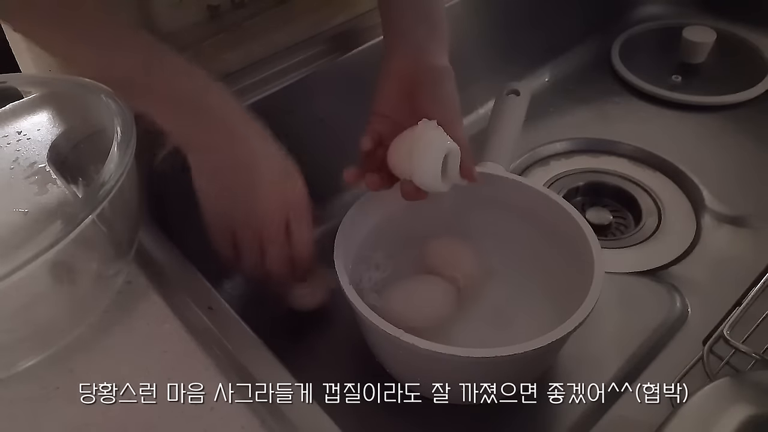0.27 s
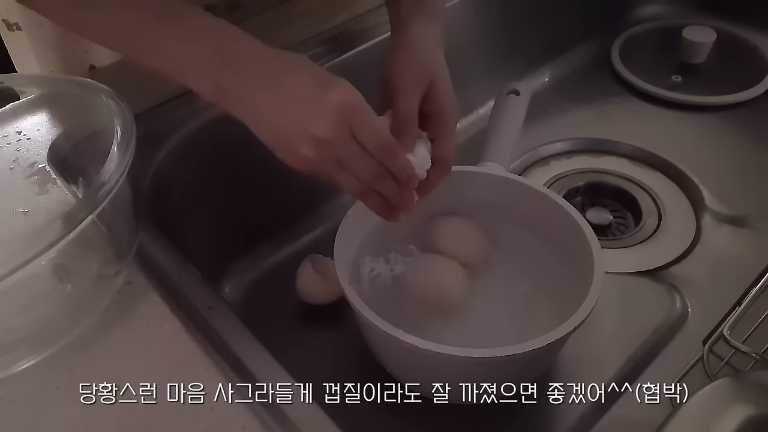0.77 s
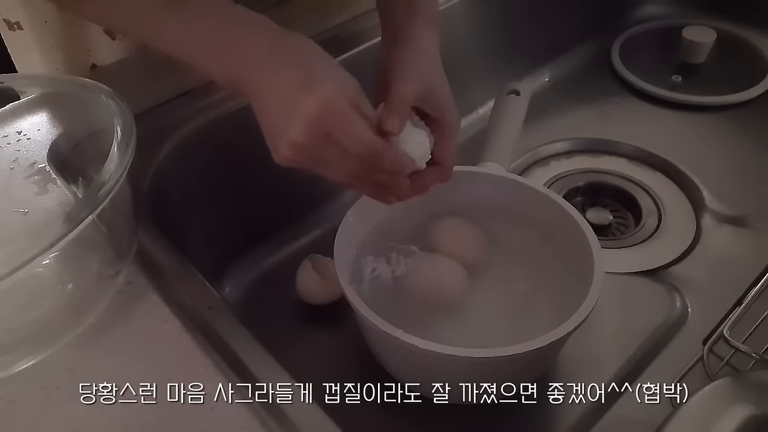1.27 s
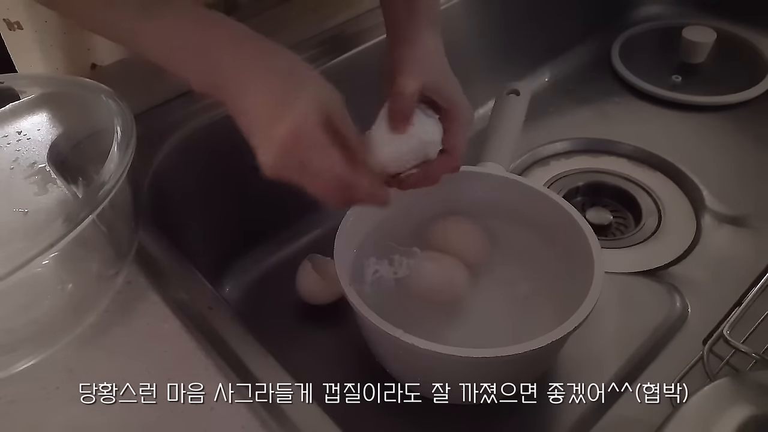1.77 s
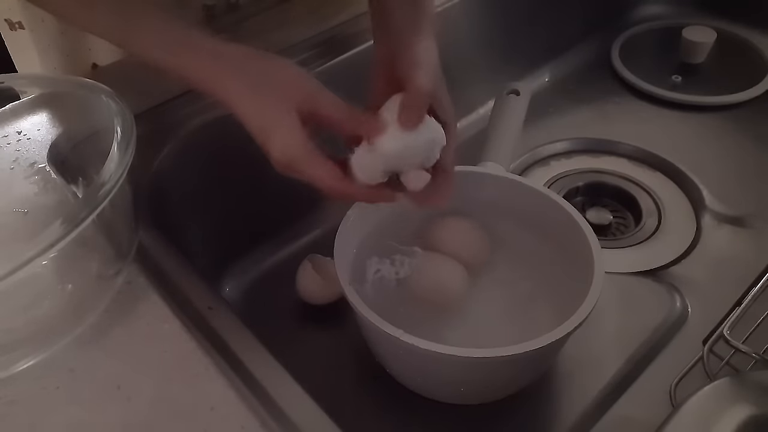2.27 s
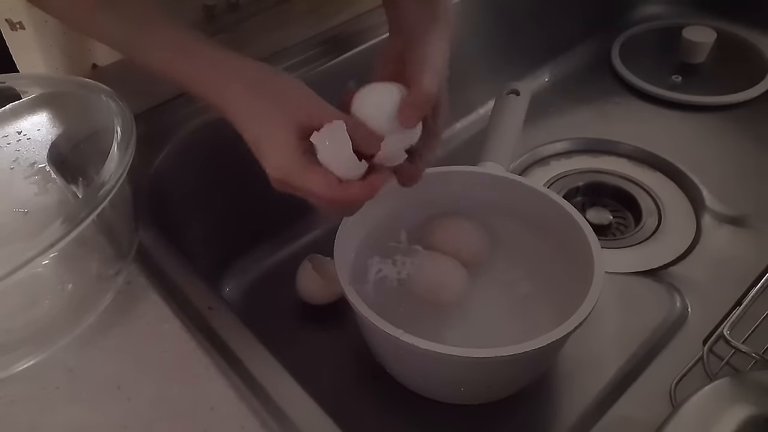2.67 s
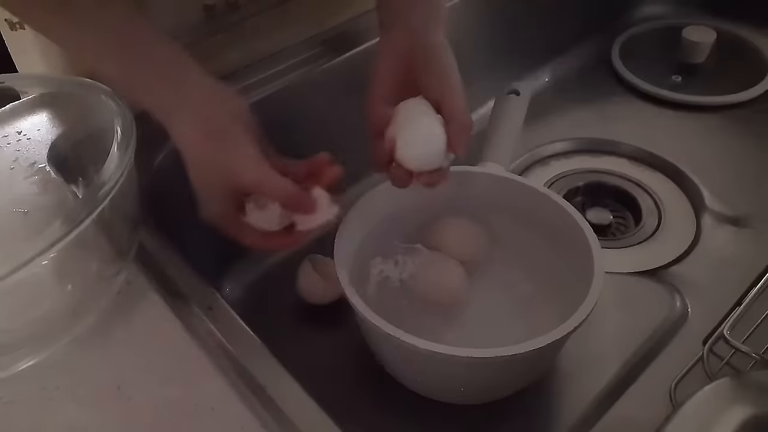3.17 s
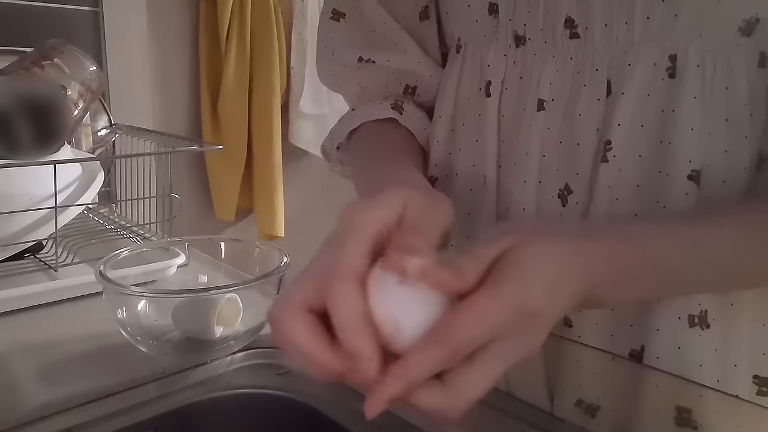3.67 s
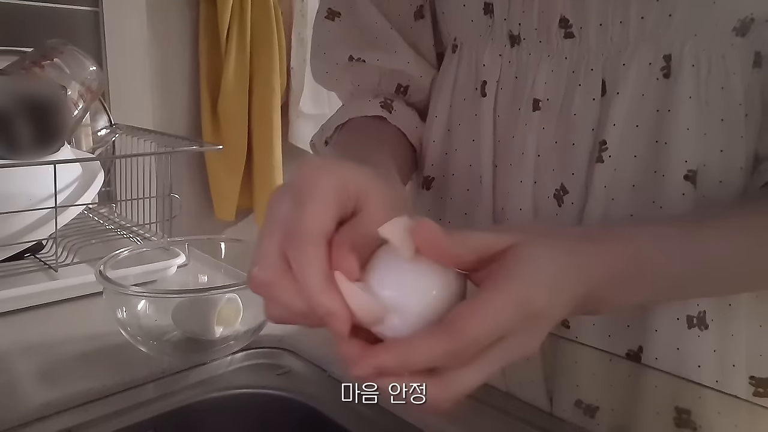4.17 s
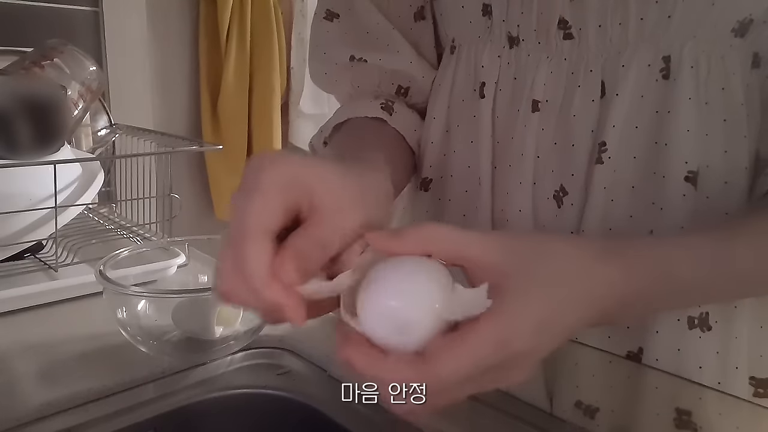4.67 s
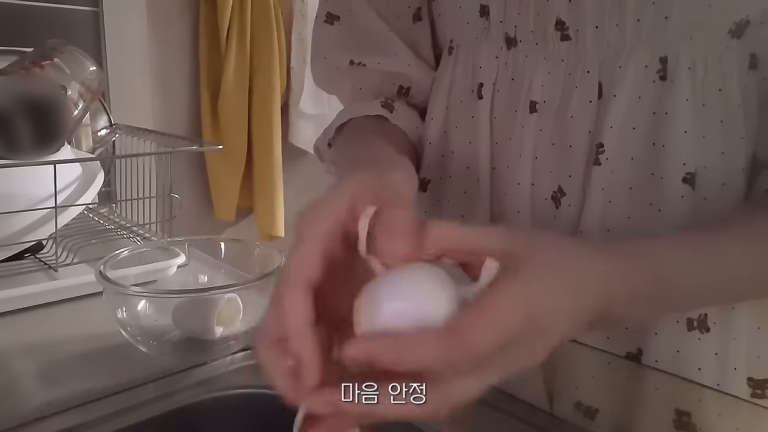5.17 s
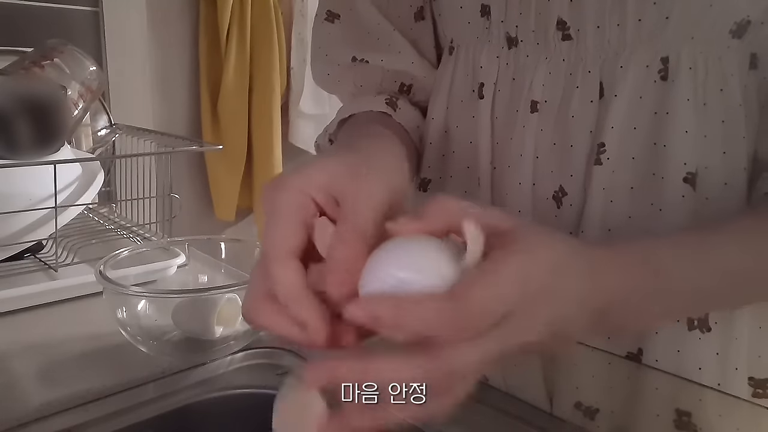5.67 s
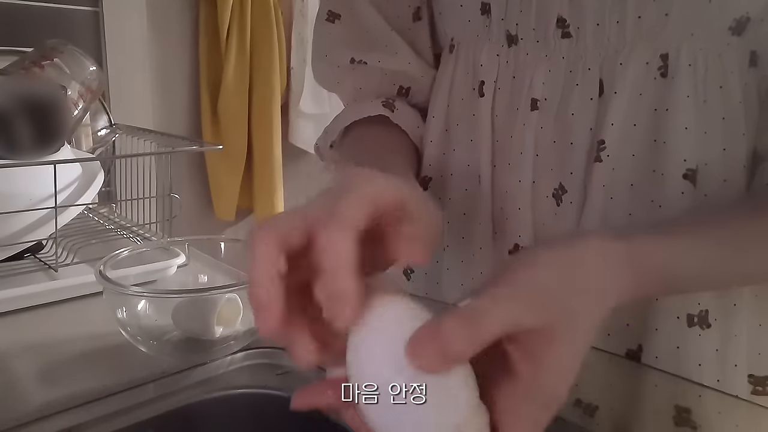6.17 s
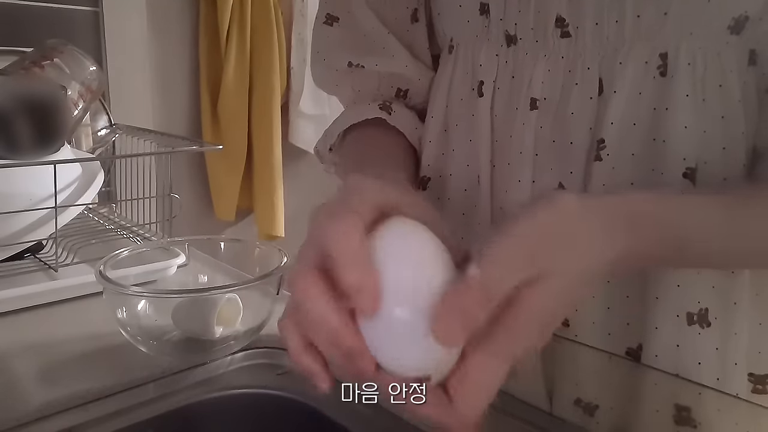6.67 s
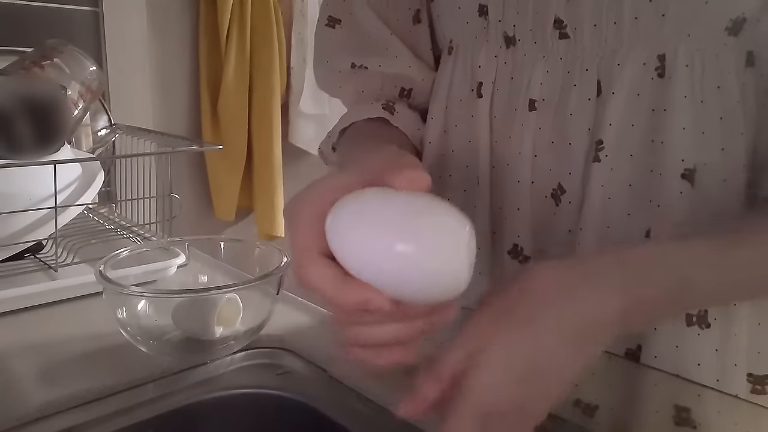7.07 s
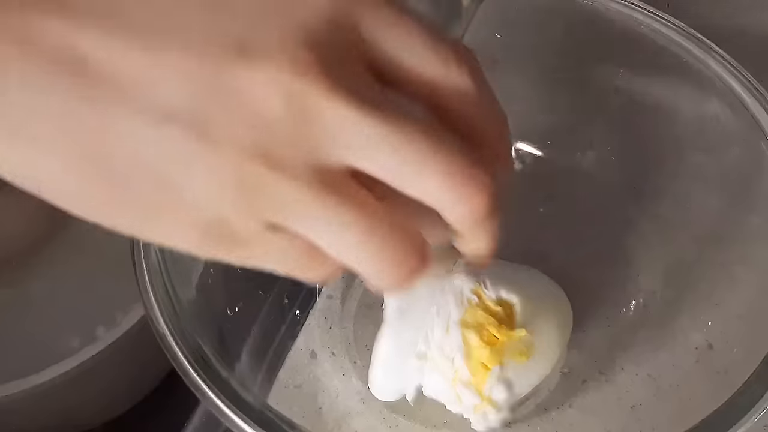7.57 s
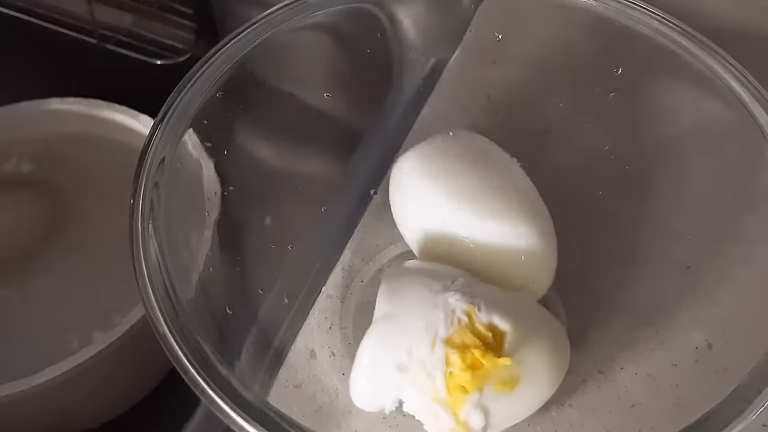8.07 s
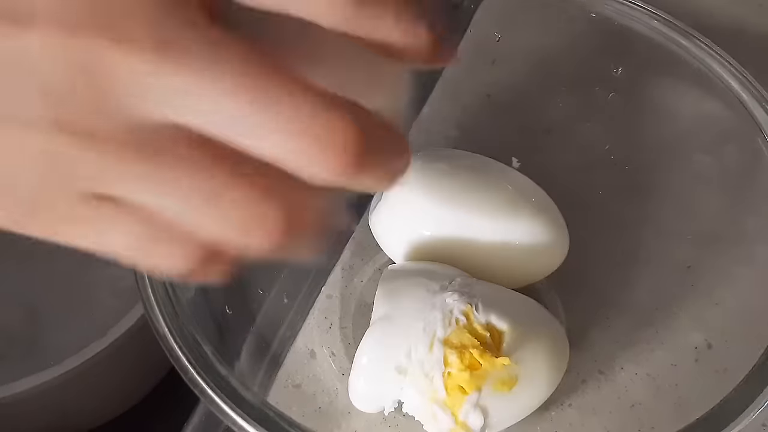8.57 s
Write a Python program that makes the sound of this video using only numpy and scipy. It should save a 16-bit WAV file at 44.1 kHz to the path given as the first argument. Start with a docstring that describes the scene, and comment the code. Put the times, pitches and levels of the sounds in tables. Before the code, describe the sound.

Close, quiet kitchen. Fingers peel a boiled egg: a dull steel boom from a dropped piece, then small bright snaps and crackly membrane tearing in uneven bursts, growing sharper midway. Bits of shell tick and boom in the sink. After a tiny silent gap, peeled eggs wobble with soft low thuds into a glass bowl. Faint mains hum and room rumble beneath.

```python
"""Peeling boiled eggs over a sink

Close on a pair of hands in a small, quiet kitchen: shell snaps and crackles in the hollow of the fingers, noise
clicks ringing in a resonant pocket. Pieces drop and set the steel basin's modes booming. At the end slippery
peeled eggs thud into a glass bowl, its low modes damped by soft contact. A mains hum of wavering sines and a
faint bed of coloured noise lie underneath; near 7.4 s all sound dips away briefly."""
import sys
import numpy as np
from scipy import signal
from scipy.fft import rfft, irfft, next_fast_len
from scipy.io import wavfile

SR = 44100
rng = np.random.default_rng(int(sys.argv[2]) if len(sys.argv) > 2 else 0)


def file_out(sig):
    """Save sig as 16-bit WAV at sys.argv[1]."""
    # one column per channel
    cols = np.atleast_2d(sig).T
    # limit, then scale
    lim = np.clip(cols, -1, 1)
    pcm = np.round(lim * 32767).astype(np.int16)
    wavfile.write(sys.argv[1], SR, pcm)


N = 388950
TIME = np.arange(N) / SR

# pulls of the thumb that tear the shell away: start_s, length_s, level_db (before trim)
PULLS = [(.61, 0.073, -65), (0.699, 0.25, -57), (1.018, .28, -54.5), (1.51, .11, -42.5), (1.659, 0.23, -49),
         (1.89, .17, -55), (2.1, 0.18, -76.5), (2.273, .1, -49), (2.388, .2, -58), (2.648, 0.25, -64),
         (2.968, .17, -66.5), (3.588, .1, -56), (3.881, 0.31, -50), (4.168, .11, -40), (4.44, .13, -43),
         (4.579, .2, -48), (4.819, .2, -61), (5.328, .12, -48.5), (5.45, 0.097, -40.5), (5.56, .24, -52),
         (6.07, .2, -49), (6.293, 0.23, -71.5), (7.292, 0.12, -65.5), (8.64, .1, -56)]
# colour of breaking shell: freq_hz, level_db
SHELL_COLOUR = [(100, -18), (400, -7), (850, -14.5), (1400, -3), (2500, -5.5), (5000, -3), (7500, 1),
                (9200, -3), (11500, 2.5), (15500, -2.5)]
# difference between left and right, less in the bass: freq_hz, side_db
STEREO_WIDTH = [(60, -15.5), (280, -10), (550, -6.5), (1000, 0), (16000, -3)]


def from_db(db):
    """Decibels to gain."""
    return 10 ** (np.asarray(db) / 20)


def rms_one(x):
    """Scale to rms 1."""
    return x / np.sqrt(np.mean(x ** 2) + 1e-20)


def hit_one(x):
    """Scale a hit to the energy of 4 ms at rms 1."""
    return rms_one(x) * np.sqrt(.004 * SR / x.shape[-1])


def in_time(rows):
    """A curve at every sample; the first and last values hold outside the table."""
    return np.interp(TIME, *np.transpose(rows))


def at_hz(points, hz):
    """Read a table on a log-frequency axis."""
    points = np.array(points)
    return np.interp(np.log(np.maximum(hz, 1)), np.log(points[:, 0]), points[:, 1])


def add(track, s, sound):
    """Mix a sound into a track at time s."""
    start = round(s * SR)
    track[:, start:start + sound.shape[-1]] += sound[:, :N - start]


def colour(x, spectrum):
    """Causal (minimum-phase) filter with the given spectrum, built by folding its cepstrum."""
    size = 2 * next_fast_len(x.shape[-1] // 2 + 1024)
    bins_hz = np.arange(size // 2 + 1) * SR / size
    cepstrum = irfft(np.log(from_db(at_hz(spectrum, bins_hz))))
    response = np.exp(rfft(2 * cepstrum[:size // 2], size) - cepstrum[0])
    return irfft(rfft(x, size) * response)[..., :x.shape[-1]]


def cut(x, hz, kind, order=2):
    """Butterworth filter."""
    return signal.sosfilt(signal.butter(order, hz, kind, fs=SR, output="sos"), x)


def stereo_noise(size):
    """Diffuse noise: alike left and right in the bass, far less alike in the treble."""
    mid, side = rng.standard_normal((2, size))
    return rms_one(mid + colour(side, STEREO_WIDTH) * [[1], [-1]])


def background(hum_db=0.0, waver=1.0, waver_hz=21.0):
    """Low room rumble and thin hiss as coloured noise, and a mains hum of sines that waver at random."""
    # hum partials: freq_hz, level_db (before wavering)
    hum_partials = [(50, -71), (100, -68)]
    # colour of the quiet room: freq_hz, level_db
    air_colour = [(22, -29), (36, -12.5), (50, 2), (75, -5.5), (120, 3), (195, -10), (285, -3.5), (420, -9),
                  (680, -17.5), (2000, -26), (4000, -28), (8500, -37), (12000, -22.5), (16000, -30.5)]
    # how the bed rises and falls: time_s, level_db
    air_level = [(0, -70), (3.3, -69.5), (7.38, -74), (7.45, -69.5), (8.82, -67)]
    level = from_db(in_time(air_level))
    hum = 0
    for hz, db in hum_partials:
        sway = 1 + waver * rms_one(cut(rng.standard_normal(N), waver_hz, "low"))
        tone = np.sin(2 * np.pi * (hz * TIME + rng.random()))
        hum = hum + np.sqrt(2) * from_db(db) * sway * tone
    air = level * rms_one(colour(stereo_noise(N), air_colour))
    return air + rms_one(level) * from_db(hum_db) * hum   # the hum follows the level of the bed


def dying(t60):
    """Diffuse noise that dies away by 60 dB in t60 seconds."""
    t = TIME[:int(t60 * SR) + 2]
    return stereo_noise(len(t)) * from_db(-60 * t / t60)


def scattered(t60, direct_db):
    """A click followed by its dense reflections off the sink and the worktop."""
    out = rms_one(dying(t60))
    spike = from_db(direct_db) * np.sqrt(out.shape[-1])
    out[0, 0] += spike
    out[1, rng.integers(0, 8)] += spike   # up to 7 samples later on the right
    return out


def struck(modes, spread_db=1.0, split_hz=3.2):
    """Each blow rings every mode with its own strength, in beating pairs that differ left and right."""
    hz, level_db, t60 = np.transpose(modes)[:, :, None]
    t60 = np.minimum(t60, .52)
    t = TIME[:int(t60.max() * SR)]
    twin_hz = hz + split_hz * rng.standard_normal(hz.shape)
    twin = np.sin(2 * np.pi * (twin_hz * t + rng.random(hz.shape)))
    decay = from_db(level_db + spread_db * rng.standard_normal(hz.shape) - 60 * t / t60)
    rings = decay * (np.sin(2 * np.pi * hz * t) + twin * (1 - np.exp(-hz * t)) / 2)   # the twin fades in
    mid = (-1) ** np.arange(len(modes))
    side = rng.choice([-1, 1], len(modes)) * from_db(at_hz(STEREO_WIDTH, hz[:, 0]))
    both = mid @ rings + side @ rings * [[1], [-1]]
    return both / np.sqrt(np.sum(from_db(level_db) ** 2))


def plate(x, ring_db=5.0, sharpness=37.0, count=2):
    """Every bit of shell has a few short resonances of its own."""
    pitches = 3500 * 2 ** (2 * rng.random(count))   # 3.5 to 14 kHz
    rings = sum(signal.lfilter(*signal.iirpeak(hz, sharpness, fs=SR), x) for hz in pitches)
    return x + from_db(ring_db) * rings


def sink(clatter_db=0.5, modes_db=-9.0, basin_db=0.5, spot_db=2.0, spot_sharpness=3.0,
         crumbs_db=-22.5, crumbs_s=.06, count=4):
    """A piece rattles and sheds crumbs; the steel booms most as it topples flat, at that spot's pitch."""
    # shell pieces landing in the sink: time_s, clatter_db, boom_db (before trims), topple_s, spot_hz
    landings = [(0.1166, -27, -11, 0.02, 278), (3.495, -24, -32.5, 0.013, 149.6),
                (5.897, -16, -29.5, .022, 1300), (6.678, -12.5, -15.5, 0.0018, 352),
                (6.709, -33, -32, .008, 350), (6.887, -39, -62, 0.0033, 357),
                (7.075, -55, -59.5, 0.0012, 353.3), (7.258, -46, -46, 0.0011, 594),
                (7.305, -45.5, -56.5, 0, 596)]
    # modes of the steel basin: freq_hz, level_db, t60_s (struck() caps it at 0.52)
    steel_modes = [(152.1, -0.5, .22), (195.6, -8, 0.3), (280, -3.5, 0.21), (352, -1, 0.25),
                   (385.9, -4, 0.31), (465, -11.5, 0.33), (529, -2.5, 0.46), (592, -6.5, .52),
                   (654, -12, 0.56), (721, -11.5, .25), (856, -7, .2), (900, -9.5, 0.42), (1000, -9, 0.23),
                   (1176, -21, 0.17), (1300, -19.5, .2), (1490, -14.5, 0.35), (1750, -17.5, 0.28),
                   (1940, -14, 0.16), (2000, -13, 0.41)]
    # colour of shell on steel: freq_hz, level_db
    clatter_colour = [(150, -11), (700, -3), (1500, -1), (3500, 2), (5500, 2), (7700, -2), (9000, -9),
                      (11500, 5), (15500, -3.5)]
    # colour of the basin's dull boom: freq_hz, level_db
    basin_colour = [(50, -26.5), (140, -2.5), (330, -1.5), (900, -2), (1500, -7), (3000, -16), (6000, -32),
                    (15000, -42)]
    rattle_s = .0075   # mean time between touches
    clatter_loss_db = 2   # per touch
    boom_loss_db = 3   # per rattle_s away from the topple
    out = np.zeros((2, N))
    for s, shell_db, boom_db, topple_s, spot_hz in landings:
        steel = np.zeros((2, SR))
        for touch in range(count):
            delay = touch * rattle_s * rng.uniform(.92, 1.08)
            clatter = hit_one(colour(scattered(t60=0.069, direct_db=-14.5), clatter_colour))
            add(out, s + delay, from_db(shell_db + clatter_db - clatter_loss_db * touch) * clatter)
            push_db = boom_db - boom_loss_db * abs(delay - topple_s) / rattle_s
            ring = struck(steel_modes, spread_db=2.5, split_hz=7.0)
            add(steel, delay, from_db(push_db + modes_db) * ring)
            boom = hit_one(colour(scattered(t60=0.13, direct_db=-9.5), basin_colour))
            add(steel, delay, from_db(push_db + basin_db) * boom)
        spot = signal.lfilter(*signal.iirpeak(spot_hz, spot_sharpness, fs=SR), steel)
        add(out, s, steel + from_db(spot_db) * spot)
        for late in rng.exponential(1, count):   # later crumbs land more softly
            crumb = hit_one(plate(colour(scattered(t60=0.051, direct_db=-6.5), SHELL_COLOUR)))
            add(out, s + late * crumbs_s, from_db(shell_db + crumbs_db) * np.exp(-late / 2) * crumb)
    return out


def grip_hz(s):
    """Pitch of the hollow of the hand at time s."""
    # pocket between fingers and egg; its pitch sinks as the hand closes: time_s, pitch_hz
    grip_curve = [(.33, 2480), (.61, 3760), (.88, 2320), (1.2, 2113), (1.52, 3240), (1.82, 3124),
                  (2.1, 3550), (3.05, 3830), (3.28, 1803), (3.39, 2400), (3.5, 4300), (3.9, 4000),
                  (4.12, 2100), (4.38, 2200), (4.6, 3000), (4.7, 4330), (5.06, 4705), (5.4, 2655),
                  (5.6, 2300), (5.72, 3300), (6.2, 2890), (6.64, 3900), (7.17, 1590), (8.7, 2820)]
    return np.interp(s, *np.transpose(grip_curve))


def hollow(x, hz, sharpness, leak_db):
    """The pocket between fingers and egg rings at its pitch and holds back the lows; a little leaks past."""
    w = 2 * np.tan(np.pi * hz / SR)   # prewarped, so the resonance stays on pitch
    through = signal.lfilter(*signal.bilinear([1, 0, 0], [1, w / sharpness, w * w]), x)
    return through - from_db(leak_db) * cut(x, hz, "low")


def snaps(gain_db=0.5, sharpness=3.7, damping=0.19, leak_db=-10.5, t60=.055, treble_hz=6500,
          run_s=.005, run_db=-4.0, count=2):
    """Each fracture is a bright click; the crack runs on in smaller ones, all ringing the fingers' hollow."""
    # the clear snaps of the shell: time_s, level_db (before trim), treble_db
    fractures = [(.330, -39, -16.5), (.502, -56.5, 4), (.607, -44.5, -4), (.730, -42, -4), (.792, -50, -4),
                 (.835, -35, -2), (.876, -34, -5), (1.013, -41.5, 8), (1.047, -41.5, -15),
                 (1.101, -25.5, 7.5), (1.146, -23.5, -1), (1.223, -40.5, -2), (1.496, -43, -1),
                 (1.538, -34.5, -9), (1.568, -29, -15), (1.594, -28, -3.5), (1.729, -28, -4),
                 (1.797, -29, -22), (1.819, -33, -6.5), (2.101, -39.5, -12.5), (2.283, -30, 0),
                 (2.340, -37, -4), (2.437, -47.5, -9), (2.496, -42, -6), (2.558, -41, 2), (2.661, -49, -6),
                 (2.705, -47.5, 3), (2.792, -40.5, 1.5), (2.843, -49.5, -2), (2.928, -47.5, -0.5),
                 (3.252, -45, 10.5), (3.311, -48.5, 8), (3.351, -52, 6), (3.387, -34.5, 2.5),
                 (3.499, -16.5, 6.5), (3.629, -29.5, -2), (3.665, -25.5, 3.5), (3.757, -41, 8),
                 (4.002, -32.5, 0), (4.023, -16.5, -4.5), (4.080, -33, -7), (4.127, -34, -16),
                 (4.196, -31, -20), (4.231, -25.5, -1.5), (4.254, -25, 4.5), (4.349, -37, -6.5),
                 (4.425, -42, 1), (4.467, -31.5, -4), (4.532, -34.5, 3), (4.577, -29.5, 2),
                 (4.614, -30.5, -1.5), (4.719, -37, 10), (4.773, -42.5, 1), (4.914, -45, 1),
                 (4.947, -38, 6), (5.056, -34.5, -3.5), (5.341, -39.5, -2), (5.395, -37, -13.5),
                 (5.415, -32.5, -6), (5.43, -25.5, -3), (5.467, -29, -4), (5.523, -23, -15),
                 (5.5393, -16, -6.5), (5.622, -20.5, -3.5), (5.653, -33, 1.5), (5.749, -42, 2.5),
                 (6.093, -43, 8), (6.133, -31.5, -8), (6.2074, -43, 5), (6.461, -44.5, -5.5),
                 (6.638, -14.5, -1.5), (7.167, -26.5, 6.5)]
    out = np.zeros((2, N))
    for s, level_db, treble_db in fractures:
        click = np.zeros((2, SR // 8))
        add(click, 0, plate(scattered(t60, direct_db=-7.0), ring_db=-2.5))
        for delay in np.minimum(rng.exponential(run_s, count), .02):
            add(click, delay, from_db(run_db) * scattered(t60, direct_db=-2.5))
        closed = from_db(-damping * np.clip(treble_db, -12, 12))   # a closed hand is duller and rings longer
        click = hollow(colour(click, SHELL_COLOUR), grip_hz(s), sharpness * closed, leak_db)
        click = colour(click, [(treble_hz / 2, 0), (treble_hz * np.sqrt(2), treble_db)])
        add(out, s, from_db(level_db + gain_db) * hit_one(click))
    return out


def crackle(gain_db=1.0, per_s=230, size_db=6.0, largest_db=13.0, sharpness=4.5, leak_db=-9.5,
            wander=.1, t60=0.049, treble_db=-2.0):
    """Each pull swells and fades; membrane tears and flakes break at random, of many sizes and pitches."""
    out = np.zeros((2, N))
    for s, length, level_db in PULLS:
        flakes = max(round(per_s * length), 2)
        stroke = np.zeros((2, round((length + t60) * SR) + 9))
        for phase in (np.arange(flakes) + rng.random(flakes)) / flakes:
            size = np.sin(np.pi * phase) * from_db(min(size_db * rng.exponential(), largest_db))
            pitch = grip_hz(s + phase * length) * 2 ** (wander * rng.standard_normal())   # wander in octaves
            bit = hollow(plate(scattered(t60, direct_db=-7.0)), pitch, sharpness, leak_db)
            add(stroke, phase * length, size * bit)
        stroke = colour(colour(stroke, SHELL_COLOUR), [(4000, 0.0053), (10000, treble_db)])
        add(out, s, from_db(level_db + gain_db) * rms_one(stroke))
    return out


def palms(gain_db=-6.0, swell_s=0.047, pull_db=-73.0):
    """Dull rubbing of skin on the egg: each turn swells and fades, and each pull of the thumb rubs faintly."""
    # the palms turn the egg: time_s, level_db (before trim)
    egg_turns = [(.83, -49), (1.84, -51.5), (2.88, -51)]
    # colour of skin rubbing: freq_hz, level_db
    skin_colour = [(60, -11), (200, 4.5), (350, 0), (600, -21), (1200, -32), (5000, -34)]
    turns = sum(from_db(db + gain_db) * np.exp(-abs(TIME - s) / swell_s) for s, db in egg_turns)
    pulls = sum(np.exp(-abs(TIME - s - length / 2) / (length / 2)) for s, length, _ in PULLS)
    return (turns + from_db(pull_db) * pulls) * rms_one(colour(stereo_noise(N), skin_colour))


def bright_ticks(colour_db=2.5, tick_db=-4.5):
    """A shell snap at 3.79 s and three weaker ones after it, each a tick with a short bright pitched colour."""
    # one loud tick and three quieter ones: time_s, level_db (before trims)
    tick_times = [(3.7885, -24.5), (3.8199, -34), (3.855, -33), (3.8842, -32)]
    # short bright partials of the tick: freq_hz, level_db, t60_s
    tick_partials = [(3260, -12, 0.07), (3940, -6, .035), (4230, -4.5, 0.047), (4860, -6, 0.052),
                     (6940, -6.5, 0.029), (7760, -7.5, 0.074), (8110, -11, 0.027)]
    out = np.zeros((2, N))
    for s, level_db in tick_times:
        add(out, s, from_db(level_db + colour_db) * struck(tick_partials, split_hz=140.0))
        tick = hit_one(cut(scattered(t60=0.058, direct_db=-16.5), [3400, 13000], "band"))
        add(out, s, from_db(level_db + tick_db) * tick)
    return out


def slide(low_hz=3200, tilt_db=0.0):
    """Wet membrane slipping over the white: one short, smooth swell of high-passed noise."""
    # the egg sliding out of its membrane: centre_s, half_width_s, level_db
    slip = (5.146, 0.015, -35)
    s, half_width, level_db = slip
    hiss = colour(cut(stereo_noise(N), low_hz, "high", order=4), [(6000, 0.032), (15000, tilt_db)])
    return from_db(level_db) * rms_one(hiss) * np.exp(-((TIME - s) / half_width) ** 2 / 2)


def bowl(ring_db=-4.0, thud_db=3.5):
    """Soft egg wobbles on glass: each slow contact leaves only the low modes and a dull bump."""
    # eggs landing in the bowl: time_s, level_db (before trims), softness_cutoff_hz, wobble_length_s
    egg_landings = [(7.629, -28.5, 568, .054), (7.686, -32.5, 590, .035), (8.642, -33.5, 431, .035),
                    (8.713, -27.5, 332, .035), (8.780, -33, 134.3, .022)]
    # modes of the glass bowl: freq_hz, level_db, t60_s
    glass_modes = [(90.7, 7.5, 0.25), (225.8, 4.5, 0.1), (319, 3.5, 0.19), (366.4, -7, 0.13),
                   (506, -8.5, 0.19), (720, -14.5, 0.45), (1041, -12, 0.097)]
    # colour of the egg's dull bump: freq_hz, level_db
    egg_colour = [(35, -10), (90, 3), (300, 3), (600, -8), (1500, -14.5), (4000, -18), (15000, 14.5)]
    # each touch of the wobble is weaker and softer than the one before
    wobble_s, loss_db, softening = .0135, 1, 0.94
    out = np.zeros((2, N))
    for s, landing_db, landing_hz, length in egg_landings:
        for touch in range(max(round(length / wobble_s), 1)):
            when = s + wobble_s * (touch + rng.uniform(-.15, .15))
            level_db = landing_db - loss_db * touch
            soft_hz = landing_hz * softening ** touch
            ring = cut(struck(glass_modes), soft_hz, "low", order=1)
            add(out, when, from_db(level_db + ring_db) * ring)
            bump = colour(scattered(t60=0.12, direct_db=-16.5), egg_colour)
            add(out, when, from_db(level_db + thud_db) * hit_one(cut(bump, soft_hz, "low")))
    return out


def kitchen(x, wet_db=-12.0, build_s=0.004):
    """The room's diffuse tail builds up quickly and dies band by band, about an octave each."""
    # kitchen reverberation: freq_hz, t60_s
    room_decay = [(150, 0.88), (500, 0.51), (1500, 0.57), (3000, 0.51), (7000, .48), (14000, 0.23)]
    t, edges = TIME[:SR], np.geomspace(70, 18000, 9)
    tail = 0
    for low, high in zip(edges, edges[1:]):
        decay = from_db(-60 * t / at_hz(room_decay, np.sqrt(low * high)))
        tail = tail + cut(stereo_noise(SR), [low, high], "band") * decay
    tail = rms_one(tail * (1 - np.exp(-t / build_s))) / np.sqrt(SR)
    return x + from_db(wet_db) * signal.oaconvolve(x, tail, axes=1)[:, :N]


def scene():
    """Hands, sink and bowl sound into the kitchen, a little to the right, over the quiet room."""
    # place of the hands: time_s, left_minus_right_db
    hands_place = [(0, -1.1), (3.2, -0.7), (3.3, -2), (4.1, -1.5), (5.5, -1.5), (6.6, -1.5), (7.2, -1.5),
                   (7.6, -2.5), (8.82, -2)]
    work = sink() + snaps() + crackle() + palms() + bright_ticks() + slide() + bowl()
    return kitchen(work) * from_db(in_time(hands_place) / 2 * [[1], [-1]]) + background()


def record(dry):
    """The level drops out briefly; the deepest bass is rolled off and the top is cut steeply."""
    # overall level, with a brief dip near 7.4 s; the end rows hold before and after it: time_s, level_db
    level_dip = [(7.383, -5.5), (7.39, -55), (7.42, -36.5), (7.435, -8.5)]
    cutoff_hz = 16000
    kept = cut(dry * from_db(in_time(level_dip)), 38, "high", order=4)
    return signal.sosfilt(signal.ellip(10, .2, 70, cutoff_hz, fs=SR, output="sos"), kept)


dry = scene()
out = record(dry)
file_out(out)
```